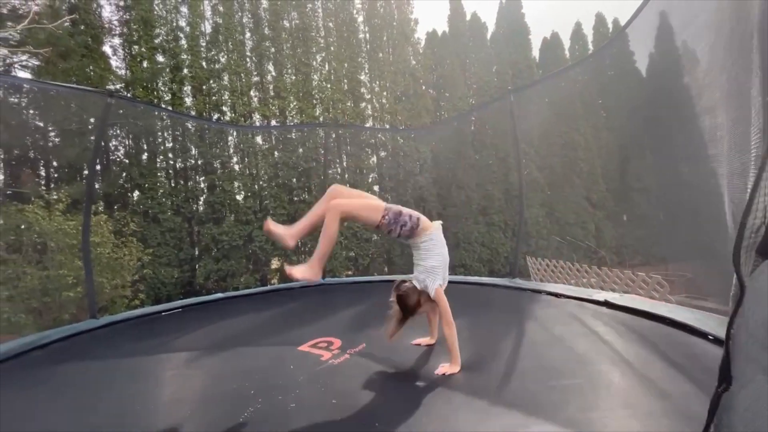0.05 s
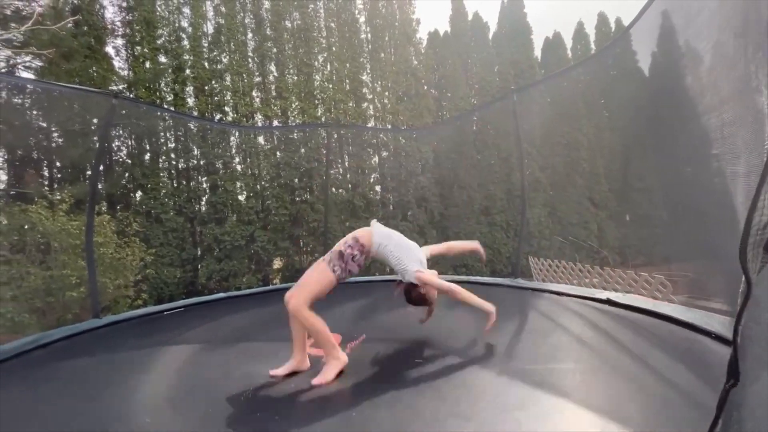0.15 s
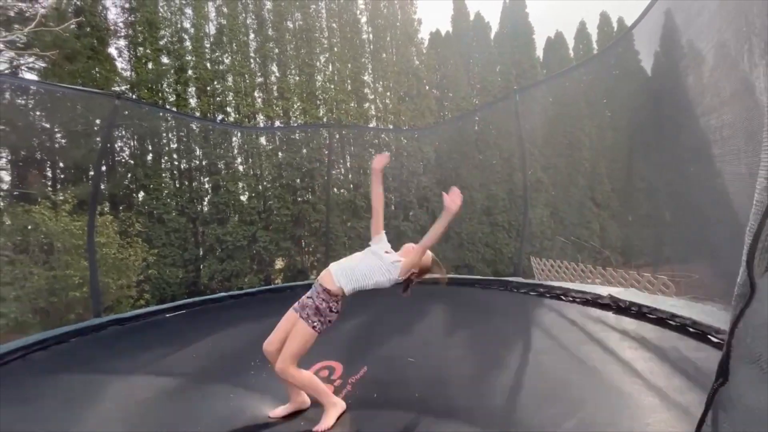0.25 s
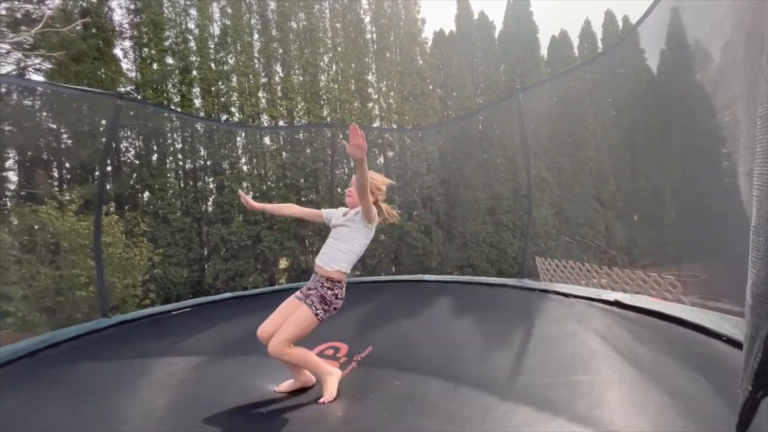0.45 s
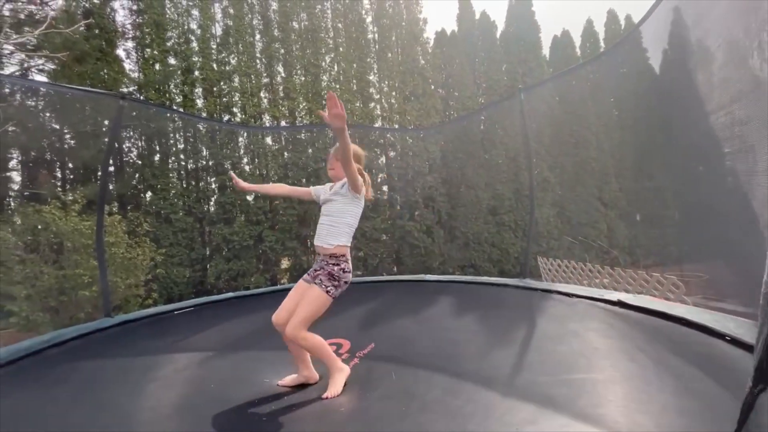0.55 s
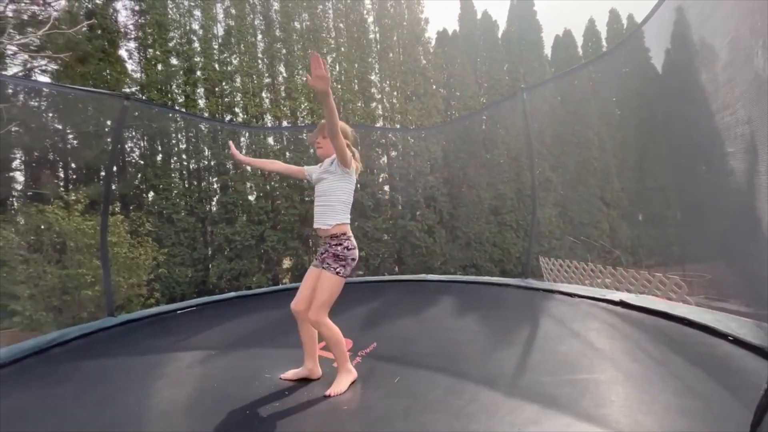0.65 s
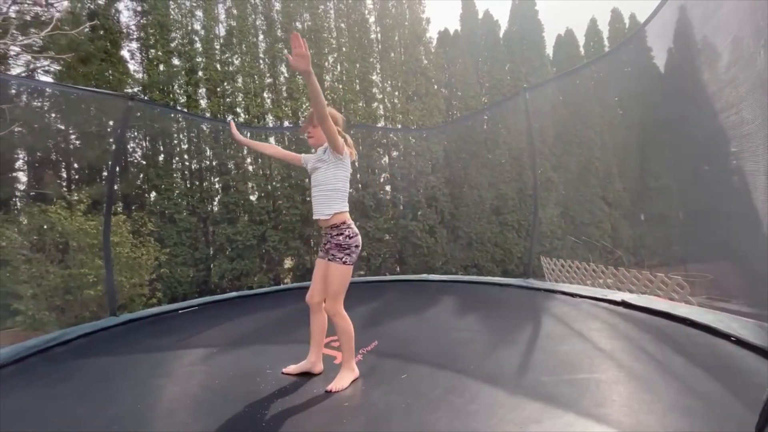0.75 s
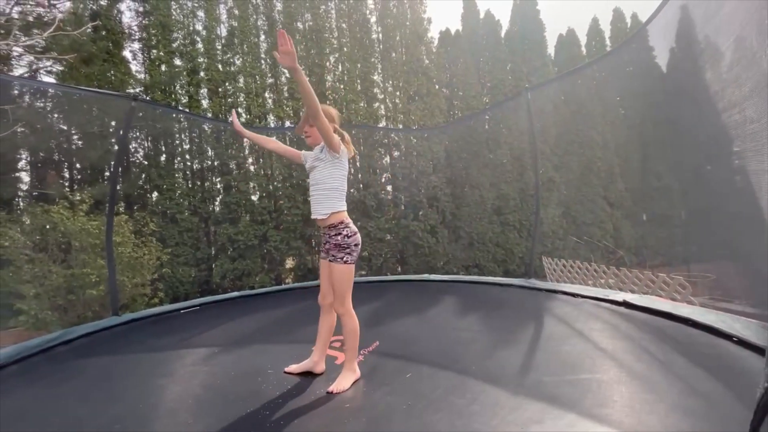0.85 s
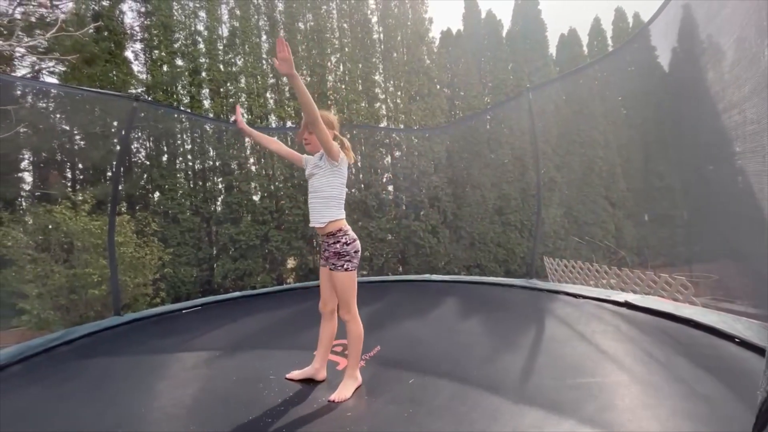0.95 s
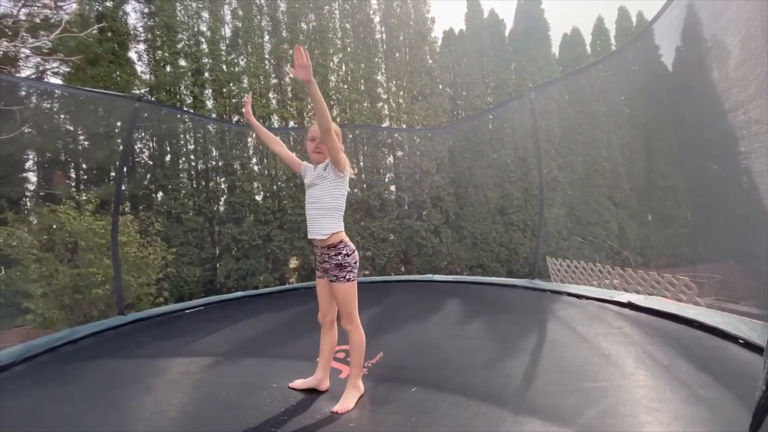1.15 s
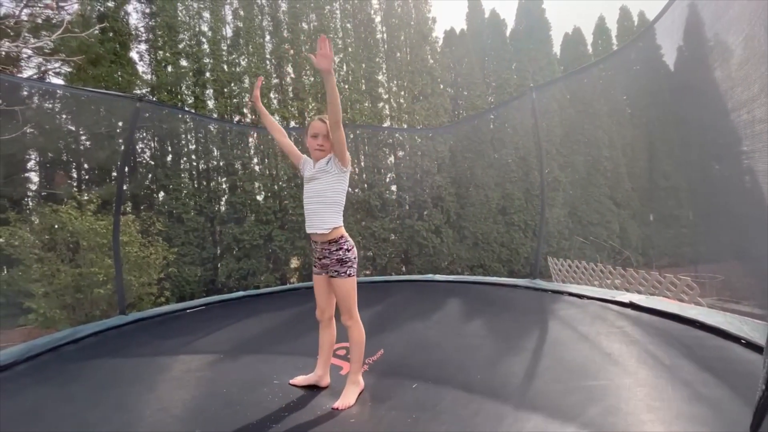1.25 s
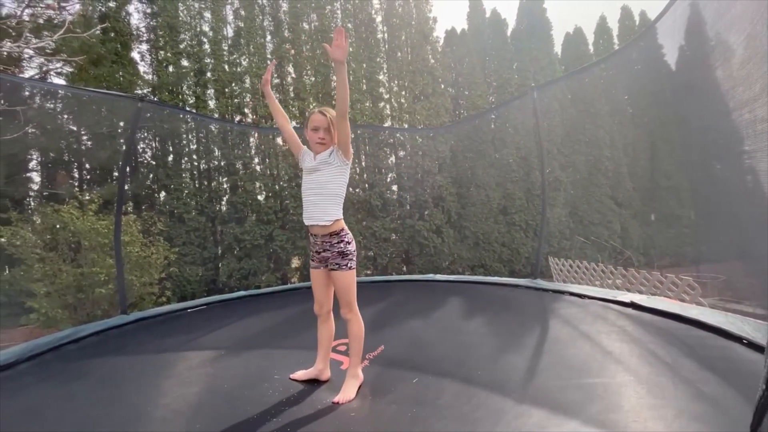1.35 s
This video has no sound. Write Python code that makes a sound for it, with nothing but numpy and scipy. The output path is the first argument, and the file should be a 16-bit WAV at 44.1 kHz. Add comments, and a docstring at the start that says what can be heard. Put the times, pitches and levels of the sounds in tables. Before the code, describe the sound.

Close to the microphone, someone lands once on an outdoor trampoline with a deep thump and a quick second slap. Metal springs jingle a little to the left, thinning into scattered clinks while a low boom lingers.

```python
"""Garden trampoline, one landing

Close by, the mat booms with a falling thump as a jumper lands, and slaps again as it rebounds.
The ring of springs, a little left of the microphones, rattles and hisses; hooks clink as it settles.
A thin squeak and light knocks come at the start, and a faint, brief high tone near the end.
A low boom lingers over a distant low rumble."""
import sys
import numpy as np
from scipy import signal
from scipy.fft import rfft, irfft, next_fast_len
from scipy.io import wavfile
from scipy.ndimage import uniform_filter1d

SR = 44100
rng = np.random.default_rng(int(sys.argv[2]) if len(sys.argv) > 2 else 0)


def wav_out(sig):
    """Save sig, one row per channel (or a flat mono array), as 16-bit PCM at SR to the path in sys.argv[1]."""
    wavfile.write(sys.argv[1], SR, np.round(np.clip(np.atleast_2d(sig).T, -1, 1) * 32767).astype(np.int16))


N = 61739
TIME = np.arange(N) / SR


def amp(db):
    return 10 ** (np.asarray(db) / 20)


def unit_rms(x):
    return x / np.sqrt(np.mean(x ** 2) + 1e-20)


def at_hz(points, hz):
    f, value = np.transpose(points)
    return np.interp(np.log(hz + 1), np.log(f + 1), value)


def over_time(table, column):
    rows = np.array(table)
    return np.interp(TIME, rows[:, 0], rows[:, column])


def filtered(x, gain):
    """Filters x by a gain given as a function of frequency."""
    size = next_fast_len(N + 4096)
    return irfft(rfft(x, size) * gain(np.fft.rfftfreq(size, 1 / SR)), size)[..., :N]


# Shading by the body that holds the microphones: f/Hz, left over right/dB
MIC_SHADE = [(60, -1), (110, 2), (200, 1), (370, 0.0), (690, 17.5), (1260, 7.5), (2320, 3.5), (4260, 13.5),
             (7820, 0), (14400, 0.5)]
def at_mics(x, lead_s, pan_db):
    """The left microphone hears the sound lead_s earlier; each side is shaded by frequency."""
    side = np.array([[.5], [-.5]])
    shade = lambda hz: amp(side * (at_hz(MIC_SHADE, hz) + pan_db))
    return filtered(x, lambda hz: shade(hz) * np.exp(2j * np.pi * hz * lead_s * side))


# Thumps on the mat and light knocks on the frame, close by:
# t/s, level/dB, first f/Hz, last f/Hz, glide/s, rise/s, t60/s
THUMPS_AND_KNOCKS = [(.198, -40.5, 946, 650, 0.0098, 0.00034, 0.04),
                     (.1985, -24, 356, 222.2, 0.0043, 0.01, 0.041),
                     (0.2062, -14.5, 147, 65, 0.0059, 0.011, 0.081),
                     (.228, -23.5, 56, 40.5, 0.021, 0.055, 0.18), (0.327, -33, 60, 51, 0.028, 0.04, 0.9),
                     (.391, -24.5, 368, 303.7, 0.0084, 0.0026, 0.081),
                     (0.4, -24, 68.3, 54.5, 0.01, 0.017, 0.29),
                     (0.4018, -21.5, 138, 123.6, 0.013, 0.0034, 0.15),
                     (0.413, -27.5, 246, 198, 0.0144, 0.0052, 0.047),
                     (.0, -44.5, 454, 380, 0.026, 0.012, 0.027),
                     (0.065, -46, 1094, 1140, 0.012, 0.0048, 0.056),
                     (.107, -52, 1076, 1096, 0.0093, 0.0036, 0.077)]
def thumps_and_knocks():
    """Mat tones fall as the wave spreads, the frame rings briefly, and bare feet slap the weave."""
    out = np.zeros(N)
    for start, db, first_hz, last_hz, glide, rise, t60 in THUMPS_AND_KNOCKS:
        age = np.maximum(TIME - start, 0)
        turns = last_hz * age + (first_hz - last_hz) * glide * (1 - np.exp(-age / glide))
        attack = np.sin(np.pi / 2 * np.minimum(age / rise, 1))
        decay = amp(db - 60 * np.maximum(age - rise, 0) / t60)
        out += attack * decay * np.sin(2 * np.pi * turns)
    slap_s, slap_db, slap_t60_s = .1975, -37, .008
    slap = (TIME >= slap_s) * amp(slap_db - 60 * abs(TIME - slap_s) / slap_t60_s)
    return at_mics(out + slap * rng.standard_normal(N), lead_s=.0001, pan_db=.1)


# Flutter of the mat, across both microphones: t/s, level/dB
FLUTTER = [(0, -39.5), (.03, -61), (.197, -62), (.2, -37.5), (.228, -43.5), (.268, -33.5), (.3, -42),
           (.35, -45.5), (.385, -34.5), (.4, -29.5), (.43, -31), (.464, -48), (.56, -57), (.7, -57),
           (.79, -60), (.95, -67.5)]
# Its spectrum: f/Hz, level/dB
FLUTTER_TONE = [(60, -30), (100, 5), (200, -4), (400, -5), (900, -11.5), (1500, -17.5), (3000, -59.5)]
def mat_flutter():
    """The loose mat flaps: rough low noise that swells around the thumps."""
    mid, side = filtered(rng.standard_normal((2, N)), lambda hz: amp(at_hz(FLUTTER_TONE, hz)))
    level = amp(over_time(FLUTTER, 1)) * (TIME < FLUTTER[-1][0])
    return level * unit_rms(np.array([mid + .66 * side, mid - .54 * side]))


# Modes of one spring on the rim: f/Hz, width before widening/Hz, level/dB
COIL_MODES = [(904.4, 20, 1.5), (1332, 42, 3), (1860, 71, 2), (2077, 27, -6.5), (3326, 45, -3),
              (3965, 72, 0), (4237, 40, 1), (4660, 22, -5), (5506, 60, -3), (6920, 37, 0.5), (7250, 34, -3),
              (8780, 60, 1.5), (10430, 73, -4), (11900, 56, -26.5)]
def coil_modes(detune, widen):
    """Yields each mode's decaying sine, its pitch times detune(); wider modes die sooner."""
    age = np.arange(4000) / SR
    for hz, width, db in COIL_MODES:
        decay = amp(db) * np.sqrt(width) * np.exp(-np.pi * width * widen * age)
        yield decay * np.sin(2 * np.pi * hz * detune() * age)


def strengths(spread_db=2):
    """A chance gain for each sample: most ticks are alike, a few are harder."""
    return amp(spread_db * np.minimum(rng.exponential(1, N), 3))


def jingle(ticks, share=.08):
    """Each tick sets off only a chance few of the coil's modes, some hard."""
    out = np.zeros(N)
    for mode in coil_modes(lambda: 1 + .0299 * rng.uniform(-1, 1), widen=.59):
        hits = ticks * (rng.random(N) < share) * strengths()
        out += signal.oaconvolve(hits, mode)[:N]
    return out


# Rattle round the rim, left of centre: t/s, mid level/dB, lows over mid/dB, top over mid/dB
RATTLE = [(0.0, -53.5, 2.5, -7), (0.028, -60, 6, -8), (0.044, -60.5, -2.5, -8), (0.064, -68, 3, -7),
          (0.076, -43, -11, -21), (0.104, -56.5, -0.5, -18), (0.118, -48.5, -9, -9.5),
          (0.166, -66, 1.5, -5), (0.188, -58, 0, -21), (0.204, -60.5, 6, -13), (0.22, -42.5, -6, -7.5),
          (0.264, -37.5, 2, -1.5), (0.326, -29, -5, -6.5), (0.374, -42, 0.5, -6), (0.382, -39, -3, 3),
          (0.402, -40, 7.5, -13), (0.45, -43, -1, -2.5), (0.475, -41.5, -6, -11), (0.501, -51.5, 4, -2),
          (0.509, -37, -10, -19), (0.555, -61, 13.5, 12), (0.631, -45.5, -2.5, -9), (0.687, -46, -0.5, -8),
          (0.735, -55, -4, -8), (0.763, -48, -3.5, -5.5), (0.803, -54, 3.5, -5.5), (0.907, -62, -3.5, -3),
          (0.921, -55, -8, -1.5), (1.019, -70.5, 4, -2.5), (1.095, -65.5, -1, -8), (1.113, -53.5, -6.5, -7),
          (1.151, -64.5, -0.5, -7), (1.175, -61, -5.5, -5), (1.217, -77.5, 4, -4), (1.31, -91.5, 5, -15),
          (1.322, -57, -2, -9), (1.386, -75, -2, 0), (1.4, -77.5, 17, 6)]
# Spectrum of rubbing hooks and weave: f/Hz, level/dB
SCRAPE_TONE = [(410, -49), (700, -9), (1210, -1.5), (1310, -7), (2640, 0.5), (4190, -11), (4700, -5),
               (10100, -9.5), (13200, -13.5), (14800, -33)]
SPRING_LEAD_S = .000573
def springs(groups=8, ticks_per_s=2300, hiss_db=.5, ring_db=-5.5):
    """Groups of springs: dense ticks ring the coils over the hiss of rubbing hooks and weave."""
    out = np.zeros((2, N))
    for _ in range(groups):
        ticks = strengths() * (rng.random(N) < ticks_per_s / groups / SR)
        ticks *= rng.choice([-1., 1.], N)
        lead, pan = rng.uniform(-1, 1, 2)
        rubbing = unit_rms(ticks) + amp(hiss_db) * rng.standard_normal(N)
        scrape = filtered(rubbing, lambda hz: amp(at_hz(SCRAPE_TONE, hz)))
        sound = unit_rms(scrape) + amp(ring_db) * unit_rms(jingle(ticks))
        out += at_mics(sound, lead_s=SPRING_LEAD_S + .00008 * lead, pan_db=4 * pan)
    below = lambda edge_hz: filtered(out, lambda hz: 1 / (1 + (hz / edge_hz) ** 6))
    low, body = below(edge_hz=3000), below(edge_hz=9000)
    low_coils = amp(over_time(RATTLE, 2)) * unit_rms(low)
    top_hiss = amp(over_time(RATTLE, 3)) * unit_rms(out - body)
    return amp(over_time(RATTLE, 1)) * (low_coils + unit_rms(body - low) + top_hiss)


# Low boom lingering in both microphones: t/s, level/dB, centre f/Hz
BOOM = [(0, -54, 51.9), (.14, -50.5, 71.6), (.19, -58, 71.74), (.3, -45, 89), (.45, -39, 69.3),
        (.52, -51.5, 67.7), (.63, -54.5, 56.94), (.76, -49.5, 57.75), (.83, -62, 65.1), (.9, -56.5, 86.7),
        (1.0, -49, 86.95), (1.08, -51, 85.7), (1.17, -55, 89.7), (1.33, -52.5, 87.8), (1.4, -56.5, 85.2)]
def boom(width_hz=38):
    """A fuzzy low tone: slow noise riding on a drifting centre pitch."""
    pole = np.exp(-np.pi * width_hz / SR)
    noise = rng.standard_normal((2, N + SR)) + 1j * rng.standard_normal((2, N + SR))
    mid, side = signal.lfilter([1], np.poly([pole, pole]), noise)[:, SR:]
    fuzz = np.array([mid + .62 * side, mid - .15 * side])
    carrier = np.exp(2j * np.pi * np.cumsum(over_time(BOOM, 2)) / SR)
    return amp(over_time(BOOM, 1)) * unit_rms((fuzz * carrier).real)


# Spectrum of the background, far from the microphones: f/Hz, level/dB
RUMBLE_TONE = [(16, -63), (28, -46), (91, -8), (147, -27), (291, -23), (396, -21), (636, -27), (683, -25),
               (825, -19), (1150, -29), (1420, -33), (1530, -36.5), (8000, -66), (10400, -99.5),
               (17600, -120)]
# How alike the two microphones hear it: f/Hz, correlation
RUMBLE_LIKENESS = [(60, 0.4), (240, 0.5), (930, -0.5), (3650, -0.15), (14400, 0.05)]
def rumble(level_db=-57.5):
    """Distant low rumble and air: steady noise, partly shared by left and right."""
    left, other = rng.standard_normal((2, N))
    shared = lambda hz: np.clip(at_hz(RUMBLE_LIKENESS, hz), 0, 1)
    right = filtered(left, shared) + filtered(other, lambda hz: np.sqrt(1 - shared(hz) ** 2))
    air = filtered(np.array([left, right]), lambda hz: amp(at_hz(RUMBLE_TONE, hz)))
    return amp(level_db) * unit_rms(air)


# From the left, a thin squeak at the start and a faint, brief high tone near the end:
# t/s, length/s, level/dB, f/Hz, wobble/Hz
HIGH_TONES = [(0.037, 0.026, -48, 5560, 17), (1.36, 0.038, -58, 9280, 250)]
def high_tones():
    """Thin tones of unsteady pitch that swell quickly and fade softly."""
    out = np.zeros(N)
    for start, length, db, hz, wobble_hz in HIGH_TONES:
        progress = np.clip((TIME - start) / length, 0, 1)
        pitch = hz + wobble_hz * unit_rms(uniform_filter1d(rng.standard_normal(N), size=60))
        out += amp(db) * np.sin(np.pi * progress ** .35) * np.sin(2 * np.pi * np.cumsum(pitch) / SR)
    return at_mics(out, SPRING_LEAD_S, pan_db=2.5)


# Single hooks on the rim, left of centre: t/s, base level/dB, note f/Hz, tilt/(dB per octave)
CLINKS = [(0.0755, -38, 7080, -2), (0.0886, -44.5, 7190, 5.5), (0.1144, -40.5, 1118, 0),
          (0.5332, -33.5, 1274, 1), (0.5593, -35, 3240, -1), (0.5694, -35, 4190, 5),
          (0.596, -35, 4060, 0.5), (0.6988, -37, 1306, -3), (0.7472, -44.5, 5030, -3),
          (0.8556, -45, 1927, 0.5), (0.9157, -44.5, 6690, 0.5), (0.9444, -47, 7060, 0),
          (1.0684, -53.5, 4060, -0.5), (1.1079, -48, 3960, 0), (1.1344, -50.5, 3920, 0),
          (1.1646, -49, 4110, -2), (1.3192, -49.5, 3990, 2)]
def clinks():
    """A hook knocks: a tick rings the whole coil, one note stands out, and a short hiss trails."""
    out, age = np.zeros(N + SR), np.arange(SR // 4) / SR
    size, margin = len(age), 200  # samples; the margin holds what the filters spread ahead of a knock
    f = np.fft.rfftfreq(size, 1 / SR)
    fade = lambda db, t60_s: amp(db - 60 * age / t60_s)
    for start, db, hz, tilt_db in CLINKS:
        hiss = rng.standard_normal(size) * (fade(db, t60_s=.012) + fade(db - 11.5, t60_s=.26))
        tick = fade(db + 8.5, t60_s=.0015) * rng.choice([-1., 1.], size)
        coil = sum(coil_modes(lambda: 1 + .012 * rng.uniform(-1.3, 1), widen=2.2))
        ring = signal.oaconvolve(tick, coil / np.linalg.norm(coil))[:size]
        spectrum = rfft(np.roll(ring, margin)) + rfft(np.roll(hiss, margin)) * amp(at_hz(SCRAPE_TONE, f))
        tilt = amp(tilt_db * np.log2(np.maximum(f, 700) / 3000))
        onset = round(start * SR)
        out[onset - margin:][:size] += irfft(tilt * spectrum, size)
        out[onset:][:size] += fade(db - 7.5, t60_s=.11) * np.sin(2 * np.pi * hz * age)
    return at_mics(out[:N], SPRING_LEAD_S, pan_db=.2)


def scene():
    return thumps_and_knocks() + mat_flutter() + springs() + clinks() + high_tones() + boom() + rumble()


def record(dry):
    """The microphone pair hears up to 14.6 kHz."""
    lowpass = signal.firwin(255, 14600, window=("kaiser", 9), fs=SR)
    return signal.oaconvolve(dry, lowpass[None], "same")


dry = scene()
out = record(dry)
wav_out(out)
```